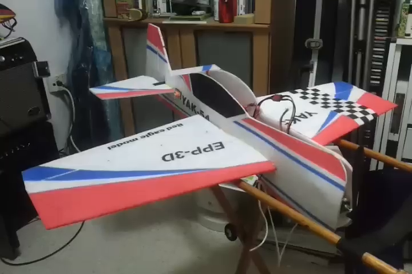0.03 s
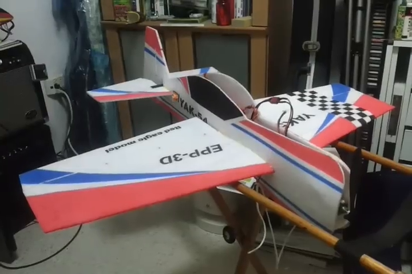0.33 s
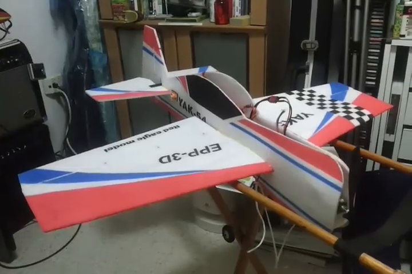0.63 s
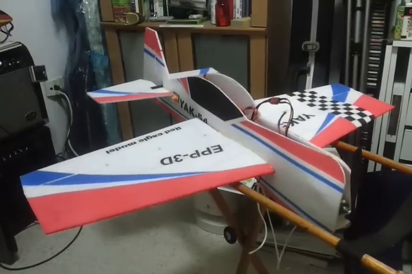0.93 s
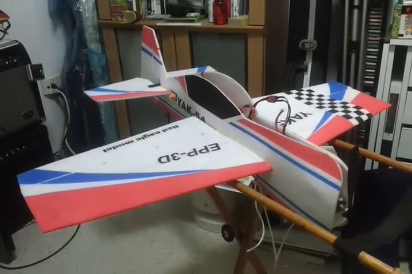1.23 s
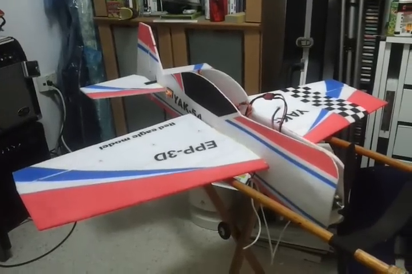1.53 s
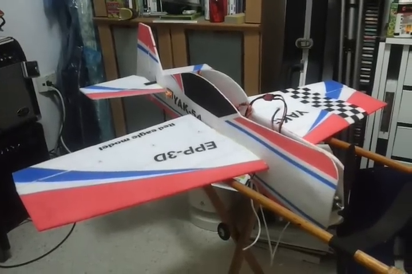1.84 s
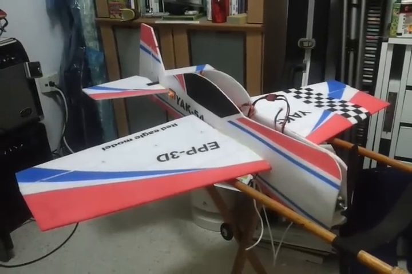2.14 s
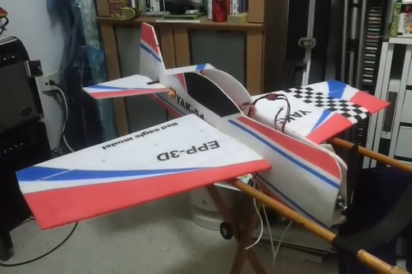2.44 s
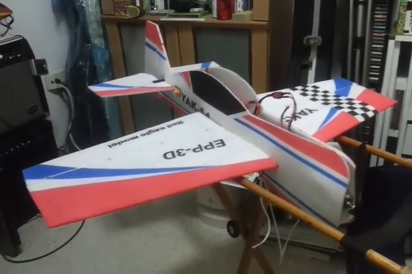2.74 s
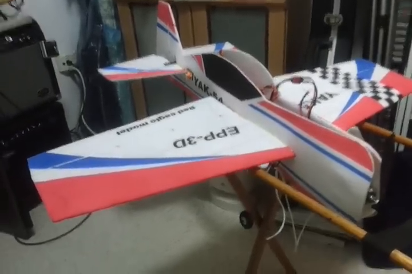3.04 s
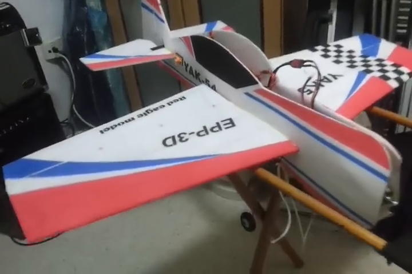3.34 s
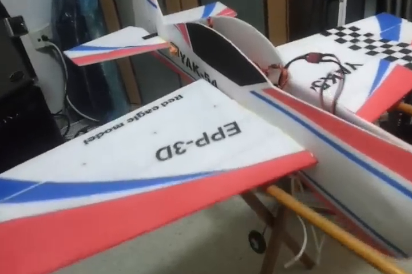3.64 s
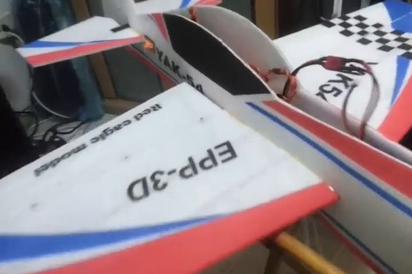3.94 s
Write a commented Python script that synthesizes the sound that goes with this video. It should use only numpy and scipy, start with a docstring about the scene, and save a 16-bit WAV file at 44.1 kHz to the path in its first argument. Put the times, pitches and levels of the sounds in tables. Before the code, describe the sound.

Small tree frogs whistle throughout, alternating short low falling notes and higher rising ones, some near, some distant, ringing slightly in a room. Steady hiss and faint hum lie beneath. Air buffets the right microphone in low puffs until about 3.2 seconds, strongest near 1.7. A soft rustle grows, something brushes the right microphone around 3.3 to 3.6 seconds, and a small dry tick follows at 3.7.

```python
"""Tree frogs outside a workshop

Small tree frogs whistle in turn: a low falling note, then a high rising one. The calls ring on
in the room, over steady hiss and a faint hum. Moving air buffets the right microphone. Late on,
something, probably a hand, brushes that side as the camera moves, and the casing ticks once."""
import sys
import numpy as np
from scipy import signal
from scipy.fft import rfft, irfft
from scipy.io import wavfile

SR = 44100
rng = np.random.default_rng(int(sys.argv[2]) if len(sys.argv) > 2 else 0)


def to_wav(s):
    """Save 16-bit WAV."""
    ch = np.atleast_2d(s).T  # columns
    pcm = np.round(np.clip(ch, -1, 1) * 32767)  # PCM
    wavfile.write(sys.argv[1], SR, pcm.astype(np.int16))


N = 176400  # 4 seconds

# The tone of the hiss. Each row: frequency in Hz, left and right strength in dB per Hz.
HISS_COLOUR = [(25, -66, -73.5), (60, -79, -67), (170, -68, -67), (244, -70, -66), (445, -69.5, -69.5),
               (626, -74, -74.5), (960, -71, -71.5), (1420, -75.5, -81.5), (2260, -78.5, -80.5),
               (3320, -78, -76.5), (3900, -80.5, -80.5), (5360, -80, -79.5), (6100, -75, -76.5),
               (6880, -75.5, -85), (7060, -77.5, -69.5), (7700, -85.5, -79.5), (9250, -95, -86.5),
               (10850, -102, -100), (14000, -110, -110)]
# The tones of the mains hum. Each row: pitch in Hz, level in dB.
HUM_TONES = [(129.2, -52), (258.4, -50.5), (387.6, -53.5)]
# A low drone that fades early on. Each row: time in seconds, level in dB.
DRONE_LEVELS = [(0, -33.5), (.55, -42), (.9, -73), (1.4, -64)]
# How the rustle grows. Each row: time in seconds, gain in dB.
RUSTLE_GAINS = [(0, -19), (1.3, -8.5), (2.1, -4.5), (2.6, -0.5), (2.95, 0), (3.15, 0.5), (3.4, -2.5),
                (3.9, 0.5), (4, -1)]
# The tone of the rustle. Each row: frequency in Hz, strength in dB per Hz.
RUSTLE_SPECTRUM = [(300, -88), (700, -79.5), (1150, -77.5), (1700, -85.5), (2300, -77), (3700, -75.5),
                   (4500, -79), (6000, -90), (12000, -115)]
# Air blowing on the right microphone. Each row: time in seconds, level in dB.
DRAUGHT_LEVELS = [(.08, -33), (.22, -26.5), (.36, -43.5), (.46, -24.5), (.55, -36.5), (.65, -26.5),
                  (.78, -44), (.9, -27), (1.0, -41.5), (1.25, -38), (1.38, -22.5), (1.53, -25.5),
                  (1.75, -17.5), (1.91, -27), (2.06, -19), (2.38, -24.5), (2.55, -37), (2.65, -27),
                  (2.73, -28), (2.83, -23), (2.95, -36.5), (3.05, -20.5), (3.22, -39), (3.4, -47), (4, -58)]
# The tone of its rumble. Each row: frequency in Hz, relative strength in dB.
RUMBLE_COLOUR = [(15, -19), (30, -1.5), (60, 1.5), (140, -2.5), (200, -10), (280, -27.5), (400, -26),
                 (700, -40.5), (2000, -78)]
# Single puffs of air. Each row: middle in seconds, peak in dB, pitch in Hz.
AIR_PUFFS = [(0.225, -19, 69), (0.441, -17, 75), (.469, -11.5, 115), (.894, -14.5, 146),
             (1.411, -14.5, 139), (1.42, -13.5, 110), (1.6582, -2, 126), (1.704, -8, 113),
             (1.74, -8.5, 140), (1.751, -14, 165), (1.829, -13.5, 139), (2.088, -14.5, 142),
             (2.142, -16, 135), (2.194, -17, 94.5), (2.275, -17, 149), (2.377, -15, 153),
             (2.407, -10.5, 125), (2.674, -10, 91), (2.835, -21, 85), (2.857, -18.5, 113), (3.02, -19, 98),
             (3.11, -18, 125)]
# How hard the brushing is. Each row: time in seconds, treble gain in dB, body gain in dB.
BRUSH_GAINS = [(2.2, -44, -22), (2.43, -18, -21.5), (2.7, -15, -22), (2.89, -11.5, -10.5),
               (3.1, -14, -17.5), (3.2, -18, -20), (3.25, -11, -13), (3.293, -3.5, -5.5), (3.33, -13, -14),
               (3.36, -6, -5), (3.392, 5.5, 3.5), (3.43, 3.5, -0.5), (3.49, 2.5, -6), (3.55, -9.5, -10),
               (3.62, -29, -13), (3.66, -36, -23), (3.78, -24, -23), (4, -25, -25)]
# The tone of the brushing. Each row: frequency in Hz, left and right strength in dB per Hz.
BRUSH_SPECTRUM = [(100, -80, -79), (250, -83, -62.5), (460, -64.5, -63.5), (880, -70.5, -56),
                  (1470, -65, -57), (2460, -70, -63.5), (4200, -73.5, -63.5), (5200, -75.5, -65),
                  (6400, -70, -58.5), (7500, -78, -55.5), (8030, -74, -59.5), (9860, -79.5, -64),
                  (11500, -82, -67.5), (15300, -95, -84)]
# The low, falling frog notes. Each row: start and length in seconds, first and last pitch in Hz,
# level in dB, distance from 0 (near) to 1 (far), left minus right in dB.
FALLING_CALLS = [(.302, 0.067, 1670, 1595, -25.5, 0, 2), (.645, 0.081, 1797, 1710, -41, 0.5, 0),
                 (.836, 0.071, 1704, 1592, -23.5, 0.11, -3), (1.125, 0.056, 1710, 1682, -39.5, 0.6, 0),
                 (1.478, .1, 1756, 1710, -38.5, 0.17, 3), (2.018, 0.086, 1675, 1588, -27.5, 0.2, -3.5),
                 (2.685, 0.061, 1772, 1735, -40, 1, 4), (2.94, 0.07, 1690, 1560, -27, 0.04, 1),
                 (2.93, 0.027, 2010, 1760, -30, 0.06, 2), (3.562, 0.093, 1645, 1614, -28, 0, -5),
                 (3.885, 0.06, 1742, 1701, -37, 0.56, -3)]
# The high, rising frog notes. Each row reads as for the low notes.
RISING_CALLS = [(.105, .1, 2815, 3273, -32.5, 0.95, -1.5), (.497, 0.092, 2580, 2945, -21, 0.15, 0),
                (.825, 0.076, 3000, 3324, -28, 0.7, -3.5), (1.036, 0.088, 2728, 3180, -17.5, 0.13, 1.5),
                (1.345, 0.079, 2960, 3294, -29, 0.74, -2.5), (1.665, .083, 2812, 3245, -27, 0.57, -0.5),
                (1.96, 0.062, 3170, 3290, -46.5, 1, -1), (2.238, 0.094, 2670, 3002, -21, 0.07, -2),
                (2.37, 0.075, 2890, 3215, -39.5, 0.6, -2), (2.85, .095, 2990, 3325, -31, 1, 2),
                (3.138, 0.074, 2730, 3183, -17.5, 0.12, 3), (3.23, 0.062, 2970, 3290, -31, 0.5, -5),
                (3.774, .1, 2695, 3028, -21, 0.06, -1)]

TIME, FREQS_HZ = np.arange(N) / SR, np.arange(N // 2 + 1) * SR / N


def gain(db):
    """Turn decibels into a number to multiply by."""
    return 10 ** (np.asarray(db) / 20)


def unit(x):
    """Scale a signal to an average (rms) size of 1."""
    return x / np.sqrt(np.mean(x ** 2))


def curve(table, column=1):
    """Join the points of a time table with straight lines."""
    rows = np.array(table)
    return np.interp(TIME, rows[:, 0], rows[:, column])


def wander(rate_hz):
    """A smooth random wobble of size 1; a higher rate wobbles faster."""
    return unit(irfft(rfft(rng.standard_normal(N)) * np.exp(-(FREQS_HZ / rate_hz) ** 2), N))


def decay(t, seconds):
    """A fade that drops 60 dB in the given time."""
    return np.exp(-np.log(1000) * t / seconds)


def band(x, hz, width_hz):
    """Keep the part of a sound near one frequency."""
    return signal.lfilter(*signal.iirpeak(hz, hz / width_hz, fs=SR), x)


def below(x, hz):
    """Keep the part of a sound under a frequency."""
    return signal.sosfiltfilt(signal.butter(2, hz, fs=SR, output="sos"), x)


def colour(white, table, column=1):
    """Give white noise the tone set out in a table."""
    rows = np.array(table)
    db = np.interp(np.log(np.maximum(FREQS_HZ, 1)), np.log(rows[:, 0]), rows[:, column])
    return irfft(rfft(white) * gain(db), N) * np.sqrt(SR / 2)


def add(out, start_s, sound):
    """Mix a sound in at its start time."""
    i = int(start_s * SR)
    out[..., i:i + sound.shape[-1]] += sound[..., :N - i]


def hiss(shared_below_hz=593):
    """Steady room noise; both microphones hear much the same bass."""
    own, common = rng.standard_normal((2, N)), rng.standard_normal(N)
    share = 0.98 / (1 + (FREQS_HZ / shared_below_hz) ** 2)
    left, right = irfft(rfft(own) * np.sqrt(1 - share) + rfft(common) * np.sqrt(share), N)
    noise = np.array([colour(left, HISS_COLOUR, 1), colour(right, HISS_COLOUR, 2)])
    return noise * gain(0.51 * wander(16))


def hum():
    """Faint mains hum made of three steady tones."""
    return sum(gain(db) * unit(np.sin(2 * np.pi * (hz * TIME + rng.random()))) for hz, db in HUM_TONES)


def drone(hz=101.7, width_hz=4.6):
    """A narrow band of noise, heard as a low note that dies away."""
    noise = band(rng.standard_normal(N), hz, width_hz)
    return unit(band(noise, hz, width_hz)) * gain(curve(DRONE_LEVELS))


def rustle(flutter_db=2):
    """A soft, uneven rustle on both sides that grows as the camera starts to move."""
    noise = np.array([colour(white, RUSTLE_SPECTRUM) for white in rng.standard_normal((2, N))])
    return noise * gain(curve(RUSTLE_GAINS) + flutter_db * wander(20))


def tick(start_s=3.733, hz=1200, left_db=-27, right_db=-28):
    """One small, dry click of the casing, nearer the left microphone."""
    out, t = np.zeros((2, N)), np.arange(SR // 10) / SR
    noise = band(rng.standard_normal((2, len(t))), hz, width_hz=2600)
    ring = unit(band(noise, hz, width_hz=8300))
    add(out, start_s, ring * gain([[left_db], [right_db]]) * decay(t, seconds=0.03))
    return out


def draught(flutter_db=2.5, left_db=-18):
    """Moving air rumbles, mostly on the right; each puff is one swing of suction, then pressure."""
    sides = []
    for _ in range(2):
        rumble = unit(colour(rng.standard_normal(N), RUMBLE_COLOUR))
        sides.append(rumble * gain(curve(DRAUGHT_LEVELS) + flutter_db * wander(23.6)))
    left, right = sides
    for middle_s, db, hz in AIR_PUFFS:
        swing = 2 * np.pi * hz * (TIME - middle_s)
        right += gain(db) * swing * np.exp((1 - swing ** 2) / 2)
    return np.array([gain(left_db) * left, right])


def brush(grain_db=0.57, brighten=1.22):
    """Grainy rubbing on the right: a light touch, a short stroke, then a firm and brighter one."""
    left, right = rng.standard_normal((2, N))
    rub = np.array([colour(left, BRUSH_SPECTRUM, 1), colour(right, BRUSH_SPECTRUM, 2)])
    rub *= gain(grain_db * wander(160))
    body = below(rub, hz=6200)
    treble = below(rub - body, hz=10500)
    top = rub - body - treble
    treble_db, body_db = curve(BRUSH_GAINS, 1), curve(BRUSH_GAINS, 2)
    top_db = brighten * treble_db  # the very top grows faster with pressure
    return body * gain(body_db) + treble * gain(treble_db) + top * gain(top_db)


def unit_energy(echoes):
    """Scale each side to a total energy of 1."""
    return echoes / np.sqrt(np.sum(echoes ** 2, axis=1, keepdims=True))


def room(note, distance, direct_db=-14, early_db=-3.5, wall_db=-15.5, wall_delay_s=0.105):
    """A note arrives directly, then as echoes; the farthest frogs are only a slowly building tail."""
    t, distance = np.arange(SR) / SR, max(distance, 0.01)
    unevenness, early, tail, wall = rng.standard_normal((4, 2, SR))
    early = unit_energy(early * np.exp(1.12 * unevenness) * decay(t, seconds=0.096))
    build_s = 0.001 + 0.088 * distance
    tail = unit_energy(tail * (1 - np.exp(-t / build_s)) * decay(t, seconds=0.43))
    wall = unit_energy(wall * decay(t, seconds=0.07))
    wall = np.roll(wall, int(wall_delay_s * SR), axis=1)  # a far wall returns the note once more
    echoes = (1 - distance) * (gain(early_db) * early + gain(wall_db) * wall) + tail
    echoes[:, 0] += (1 - distance) * gain(direct_db)
    heard = signal.fftconvolve(note[None], echoes, axes=1)
    return unit_energy(heard) * np.sqrt(np.sum(note ** 2))  # each side keeps the note's energy


def frogs(calls, bend, swell_db, overtone_db=-28.5, attack_s=0.006, release_s=0.02):
    """Each call is a nearly pure whistle that swells as its pitch slides, heard through the room."""
    out, waver = np.zeros((2, N)), 1 + 0.0041 * wander(110)
    for start_s, length_s, first_hz, last_hz, db, distance, pan_db in calls:
        t = np.arange(int(length_s * SR)) / SR
        progress = t / length_s
        hz = last_hz + (first_hz - last_hz) * (1 - progress) ** bend  # the slide flattens at the end
        hz *= np.roll(waver, -int(start_s * SR))[:len(t)]
        phase = 2 * np.pi * np.cumsum(hz) / SR
        tone = np.sin(phase) + gain(overtone_db) * np.sin(2 * phase)
        fades = np.minimum(t / attack_s, 1) * np.minimum((length_s - t) / release_s, 1)
        swell = gain(swell_db * np.minimum(2 * progress, 1))  # grows until the middle of the note
        whistle = gain(db) * unit(tone * fades * swell)
        add(out, start_s, room(whistle, distance) * gain([[pan_db / 2], [-pan_db / 2]]))
    return out


def scene():
    """Mix the frogs, the background and the noises at the microphones."""
    low = frogs(FALLING_CALLS, bend=1.72, swell_db=2)
    high = frogs(RISING_CALLS, bend=1.7, swell_db=5)
    background = hiss() + hum() + drone()
    return low + high + background + draught() + brush() + rustle() + tick()


def record(dry, silence_s=0.0757, fade_s=0.004, top_hz=14600):
    """The sound fades in quickly after a moment of silence, and the highest treble is cut."""
    fade_in = np.clip((TIME - silence_s) / fade_s, 0, 1)
    treble_cut = signal.ellip(10, 0.1, 90, top_hz, fs=SR, output="sos")
    return signal.sosfilt(treble_cut, dry * fade_in)


dry = scene()
out = record(dry)
to_wav(out)
```